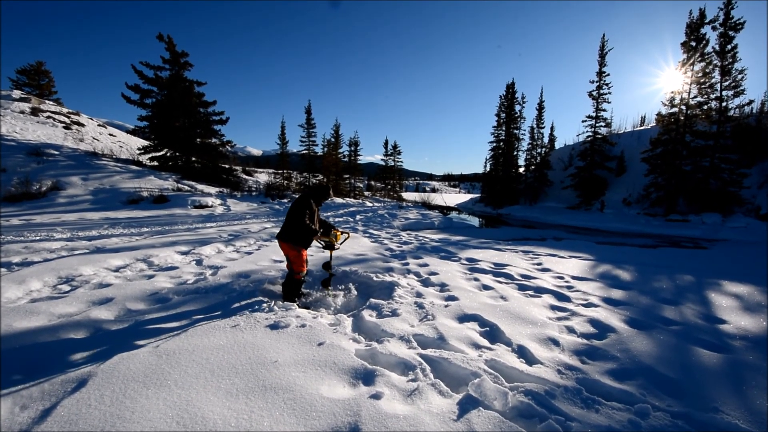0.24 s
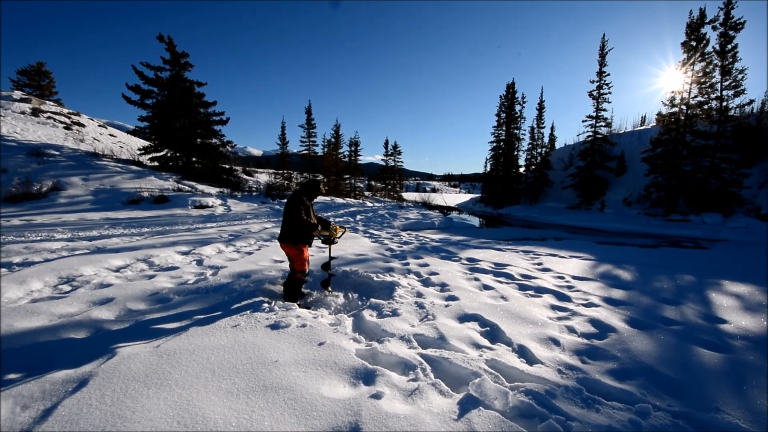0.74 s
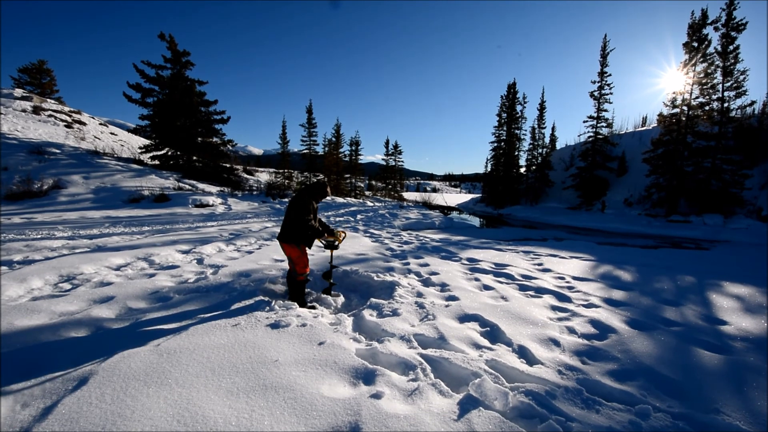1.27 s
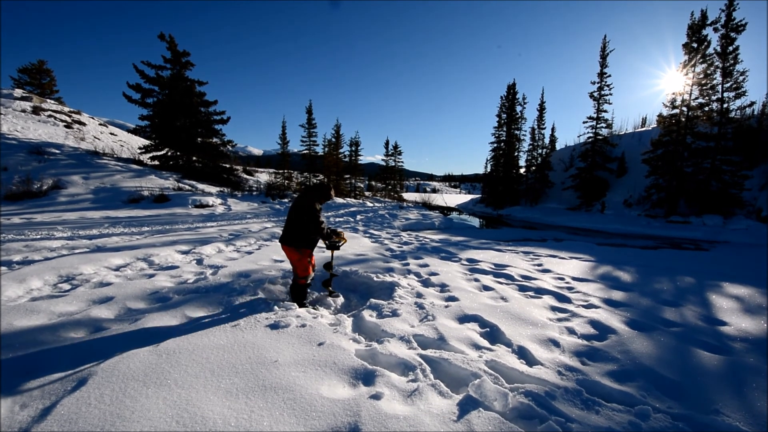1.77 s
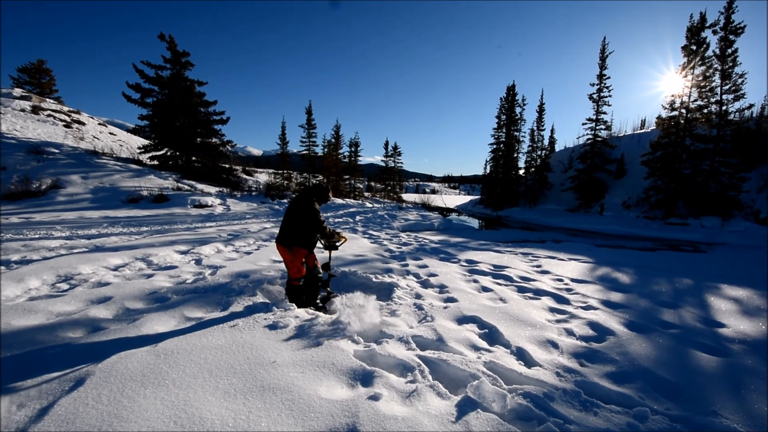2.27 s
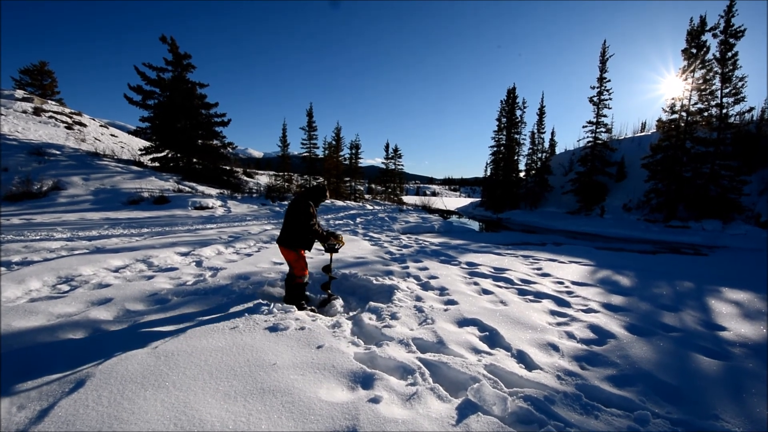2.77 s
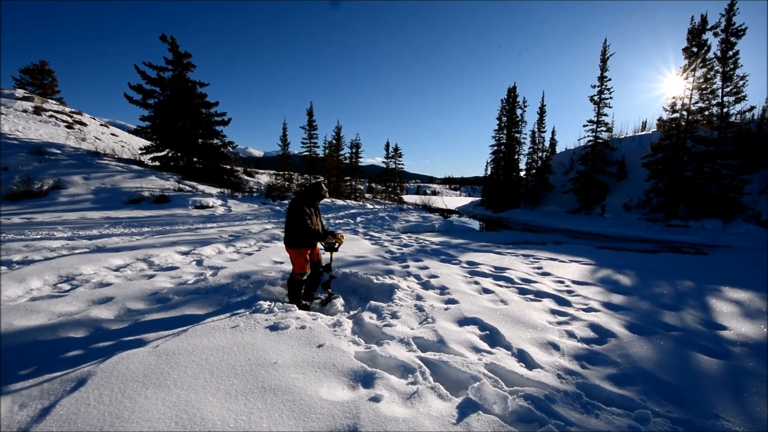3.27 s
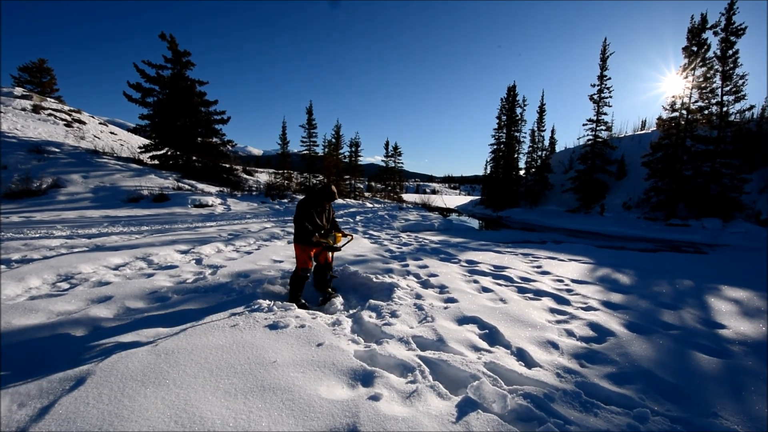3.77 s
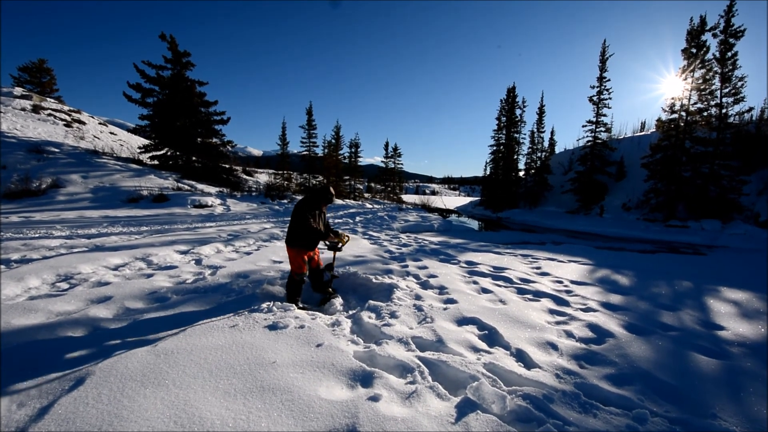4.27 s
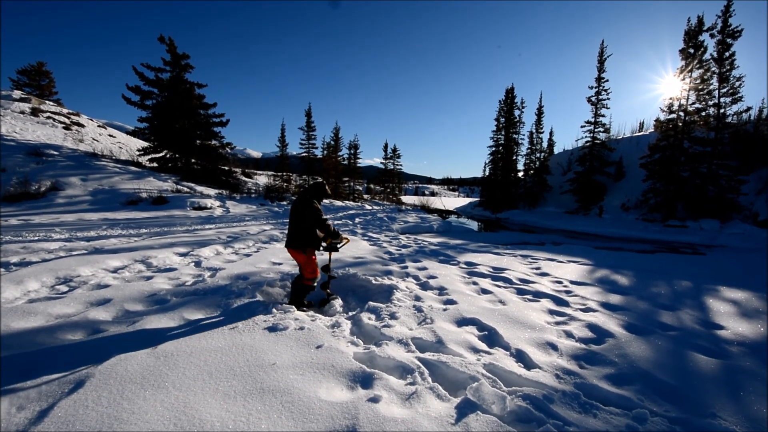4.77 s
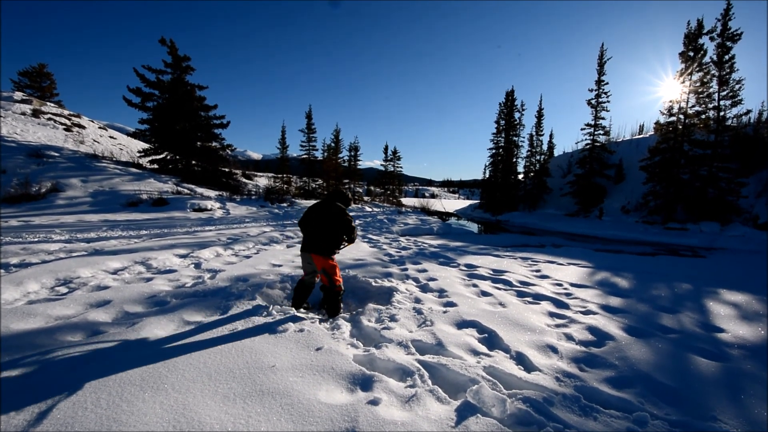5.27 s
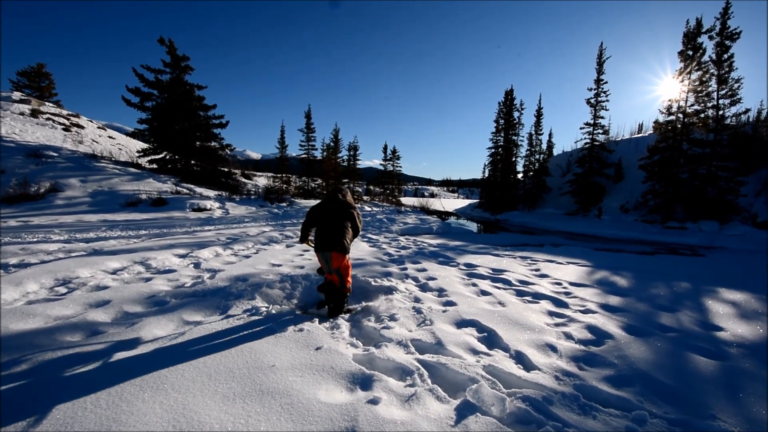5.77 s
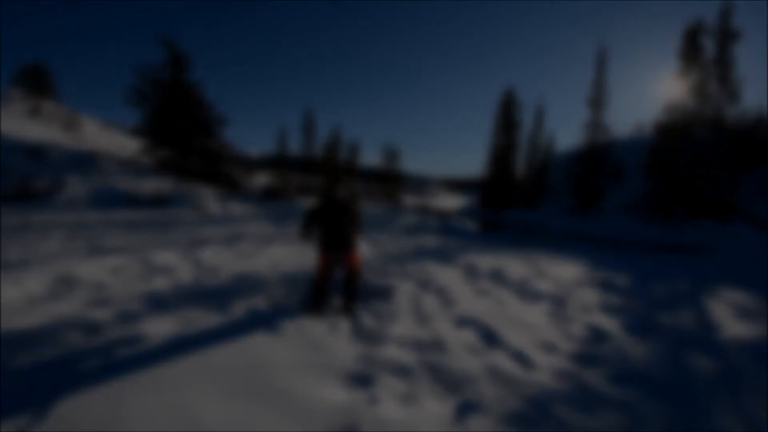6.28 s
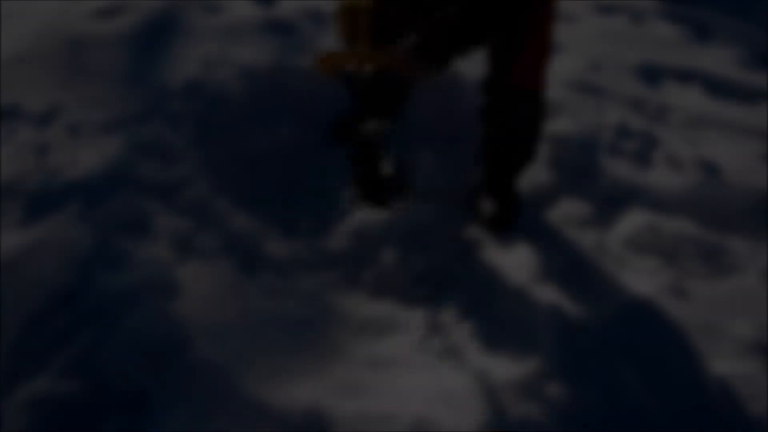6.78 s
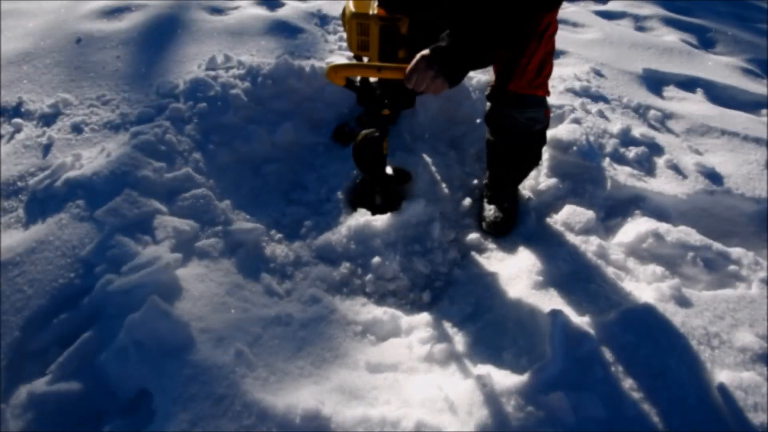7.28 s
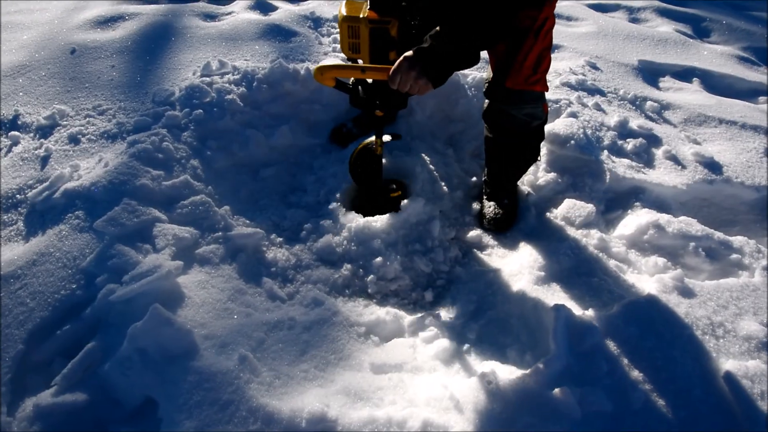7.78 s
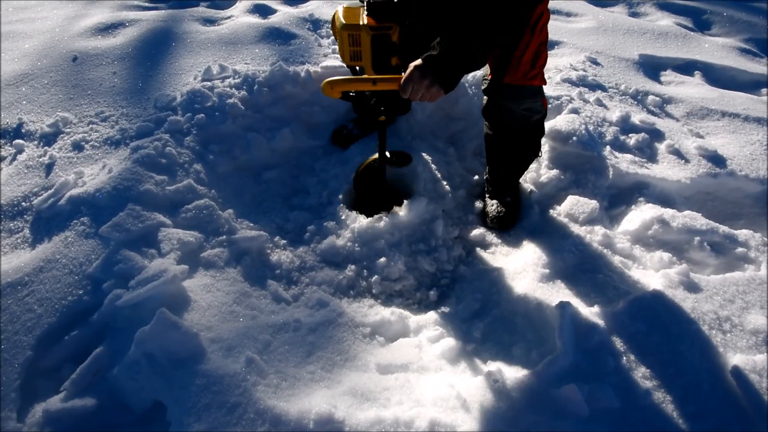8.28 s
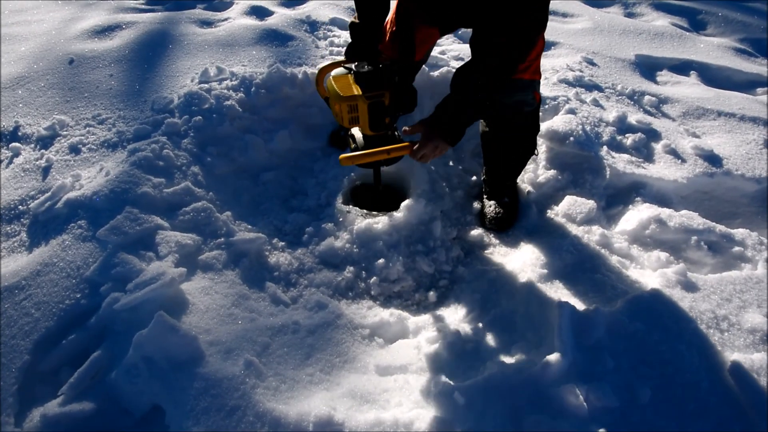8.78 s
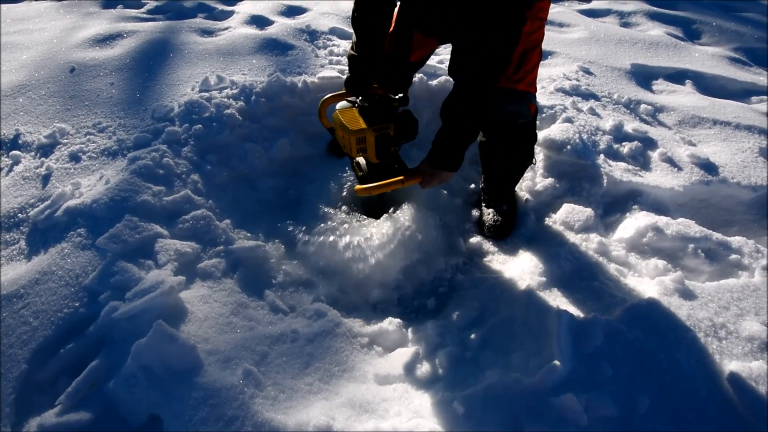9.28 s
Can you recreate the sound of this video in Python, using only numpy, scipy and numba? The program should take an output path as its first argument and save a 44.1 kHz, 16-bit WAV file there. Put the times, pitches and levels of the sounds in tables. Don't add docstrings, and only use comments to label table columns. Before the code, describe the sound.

Gas-powered ice drill on an open snowy lake coasts down to a ragged idle, cuts abruptly to labouring, whining drilling, then winds down again.

```python
import sys
import numpy as np
from scipy import signal
from scipy.fft import rfft, irfft, next_fast_len
from scipy.io import wavfile
from scipy.ndimage import uniform_filter1d
from numba import njit

SR = 44100
rng = np.random.default_rng(int(sys.argv[2]) if len(sys.argv) > 2 else 0)


def volts_from_decibels(level):
    exponent = np.asarray(level, float) / 20
    return 10 ** exponent


def generate_wav(sig):
    pcm = np.round(np.clip(np.atleast_2d(sig).T, -1, 1) * 32767).astype(np.int16)
    wavfile.write(sys.argv[1], SR, pcm)


N = 420273
CHANGE_S = 5.895


def unit(x):
    return x / np.sqrt(np.mean(x ** 2))


def on_log(hz, table):
    f, db = np.transpose(table)
    return np.interp(np.log(np.maximum(hz, 1)), np.log(f), db, db[0] - 36, db[-1] - 32)


def colour(x, table):
    size = next_fast_len(N)
    hz = np.arange(size // 2 + 1) * SR / size
    return irfft(rfft(x, size) * volts_from_decibels(on_log(hz, table)), size)[:N]


@njit
def svf(x, hz, width):
    y, b, l = np.empty(len(x)), 0., 0.
    for i in range(len(x)):
        g, k = np.tan(np.pi * hz[i] / SR), width[i] / hz[i]
        v = (b + g * (x[i] - l)) / (1 + g * (g + k))
        b, l, y[i] = 2 * v - b, l + 2 * g * v, k * v
    return y


def ring(x, modes):
    return sum(volts_from_decibels(db) * 300 / w * signal.lfilter(*signal.iirpeak(f, f / w, SR), x) for f, w, db in modes)


def walk(rate):
    k = int(SR / rate)
    held = np.repeat(rng.standard_normal(N // k + 1), k)
    return 1.52 * uniform_filter1d(uniform_filter1d(held, k), k)[:N]


def spell(t, start_s, end_s):
    return np.clip(np.minimum(t - start_s, end_s - t) / 0.065, 0, 1)


def spells(t, rows):
    return sum(np.outer(row[2:], spell(t, *row[:2])) for row in rows)


# start_s, peak_db
CRACKS = [(0.942, -26), (1.027, -31), (1.1712, -23), (1.299, -20.5), (1.3591, -23), (1.4661, -35),
          (1.6563, -30), (1.8976, -28), (2.0107, -26), (2.0904, -27.5), (2.2907, -35), (2.4456, -33),
          (2.603, -34), (2.7268, -29), (2.7966, -26.5), (2.8656, -29), (2.937, -32), (2.9906, -30),
          (3.0634, -31), (3.1351, -26.5), (3.2082, -28), (3.353, -34.5), (3.3907, -31), (3.4442, -33),
          (3.5533, -30), (3.735, -26.5), (3.8079, -29.5), (3.934, -26.5), (4.0252, -28), (4.1346, -26),
          (4.2246, -28.5), (4.2975, -26)]
# start_s, peak_db
LATE_CRACKS = [(4.3875, -28), (4.567, -38), (4.628, -29.5), (4.7041, -33), (4.951, -35), (5.045, -33),
               (5.1174, -29.5), (5.2116, -31.5), (5.3069, -35.5), (5.4032, -41), (5.48, -42), (5.557, -42),
               (5.617, -40), (5.693, -40), (5.772, -43), (5.896, -38), (6.2151, -22), (6.2849, -17),
               (6.3984, -18.5), (6.465, -17), (6.498, -17), (6.539, -18), (6.637, -17), (6.711, -20.5),
               (8.04, -19.5), (8.4085, -23), (9.008, -26), (9.3103, -22), (9.382, -21.5), (9.4411, -22),
               (9.502, -19)]


def hard_firings():
    return np.vstack([CRACKS, LATE_CRACKS])


# start_s, crank_hz, level_db, throttle (0-1)
FAR = [(0.0, 102.6, -25, 0.86), (0.11, 114, -26, 0.75), (0.19, 121.8, -25.5, 0.54),
       (0.27, 126, -25.5, 0.46), (0.421, 118, -26, 0.23), (0.79, 91.54, -27.5, 0.22),
       (1.26, 70.2, -28.5, 0.45), (1.4, 65.3, -29.5, 0.3), (2.031, 62.34, -34.5, 0.37),
       (2.62, 56.3, -37, 0.5), (2.76, 57.46, -36.5, 0.56), (3.23, 55.42, -37, 0.53),
       (4.1, 54.9, -35.5, 0.51), (4.2, 55.6, -36, 0.54), (4.548, 54.5, -36, 0.41), (4.7, 52.47, -39, 0.53),
       (5.232, 52.64, -43, .1), (5.381, 50.8, -48, 0.27), (5.88, 50.56, -47.5, 0.24)]
# start_s, crank_hz, level_db, throttle (0-1)
NEAR = [(5.903, 91.22, -40, 0.78), (5.98, 82.34, -41, 0.92), (6.18, 68.63, -31, 0.89),
        (6.24, 72.97, -30, 0.94), (6.491, 73.82, -29, 0.87), (6.6, 71.6, -30.5, 0.9),
        (6.76, 97, -25.5, 0.8), (6.89, 97.57, -26.5, 0.83), (7.13, 90.74, -28, 0.88),
        (7.49, 86.32, -28, 0.92), (7.82, 75.26, -28, 0.98), (8.06, 77.47, -29, 0.96),
        (8.229, 85.9, -27, 0.9), (8.37, 87.35, -28.5, 0.9), (8.52, 107.8, -25, 0.83),
        (8.6, 116.2, -25.5, 0.71), (8.73, 124.2, -27, 0.74), (8.8, 122, -26, 0.27),
        (8.98, 101.5, -27.5, 0.22), (9.21, 81.23, -25.5, 0), (9.36, 70.44, -27.5, 0.18),
        (9.53, 61.8, -29.5, 0.53)]


def engine_course(t, hard_s):
    kick_hz, sag_s = 1.2, .05
    far, close = np.transpose(FAR), np.transpose(NEAR)
    hz, can_db, throttle = (np.where(t > CHANGE_S, np.interp(t, close[0], b), np.interp(t, far[0], a))
                            for a, b in zip(far[1:], close[1:]))
    kicks = np.zeros(N)
    kicks[(hard_s * SR).astype(int)] = kick_hz
    kicks = signal.lfilter([1], [1, -np.exp(-1 / (sag_s * SR))], kicks)
    kicks = uniform_filter1d(kicks, size=300) - uniform_filter1d(kicks, size=12000)
    return hz + kicks, can_db, throttle, kicks / kick_hz


def crank(hz, fire_s):
    turns = np.cumsum(hz) / SR
    at, shift = [fire_s[0] * SR], [-turns[int(fire_s[0] * SR)] % 1]
    for s in fire_s[1:]:
        miss = (turns[int(s * SR)] + shift[-1] + .5) % 1 - .5
        if abs(miss) < .17 or s - at[-1] / SR > .25:
            at.append(s * SR)
            shift.append(shift[-1] - miss)
    return turns + np.interp(np.arange(N), at, shift)


def rasp(turn, since, memory):
    fresh = rng.standard_normal((turn.max() + 1, 1200))
    rows = signal.lfilter([np.sqrt(1 - memory ** 2)], [1, -memory], fresh, axis=0)
    return rows[turn, np.minimum(since * SR, 1199).astype(int)]


# pitch_hz, level_db
ROAR_FAR = [(88, -60), (150, -28), (216, -20), (356, -23.5), (776, -6.5), (1010, -6), (1620, 0.5),
            (2040, -3), (2470, -2.5), (2820, -7), (5000, -15.5), (6500, -43), (11000, -120)]
# pitch_hz, level_db
ROAR_NEAR = [(88, -19), (150, -16.5), (290, -15.5), (362, -9), (554, -6.5), (660, -10), (732, -3.5),
             (1520, -1.5), (2400, 0), (4130, -17.5), (5000, -15.5), (6500, -20), (11000, -120)]


def loaded_roar(gas, near, throttle):
    thin_db, thin_below_hz = -4.5, 740
    roar = (1 - near) * unit(colour(gas, ROAR_FAR)) + near * unit(colour(gas, ROAR_NEAR))
    low = signal.sosfiltfilt(signal.butter(2, thin_below_hz, fs=SR, output="sos"), roar)
    return roar - near * (1 - volts_from_decibels(thin_db * np.clip((.9 - throttle) / 0.21, 0, 1))) * low


# start_s, chamber_db, can_db, shell_db, hum_db
FACING = [(1.35, -2, -5, -25, 0), (1.6, -3.5, 1.5, -15, 4), (2.0, -0.5, 3, -16, 2.5),
          (2.6, -0.5, 5, -20, 0), (3.42, 0, 5, -26, 1), (3.5, -4.5, 9.5, -22, 2.5), (3.9, -7.5, 1, -35, 3),
          (4.2, -1.5, 1, -20, 1), (4.65, -0.5, -3, -13, 1.5), (5.2, 3.5, -1, -15, 4),
          (5.34, -8, -4, -20, 1), (5.56, -1, 2, -20, 1), (5.62, -12, 8, -20, 2)]


def facing(t):
    s, *faces = np.transpose(FACING)
    return [np.interp(t, s, db) for db in faces]


# pitch_hz, width_hz, level_db
MUFFLER = [(330, 60, -21), (1690, 36, 1.5), (2140, 97.7, -8), (2280, 120, -6), (2870, 750, -41),
           (3875, 59.4, -6.5)]
# pitch_hz, width_hz, level_db
SHELL = [(2380, 110, 0)]
# pitch_hz, level_db
ROAR_IDLE = [(150, -34), (300, -29), (500, -22), (700, -16), (1000, -13), (1380, -15), (1800, -7),
             (2400, -4), (3500, -11), (5000, -21), (6500, -50)]
SKIPPED_S = [
    3.335,
]


def muffler(t, turns, hz, idle, near, throttle):
    putt_hz, putt_s = 1380, .0075
    turn, angle = np.maximum(turns.astype(int), 0), turns % 1
    chance = rng.standard_normal((turn.max() + 2, 3))[turn].T
    new_turn = np.r_[0, np.diff(turn)]
    start = np.maximum.accumulate((new_turn > 0) * np.arange(N))
    since = (np.arange(N) - start) / SR + angle[start] / hz[start]
    skipped = np.abs(start[:, None] / SR - SKIPPED_S).min(axis=1) < .007
    size = volts_from_decibels(1.1 * chance[0]) * np.where(skipped, .2, 1)

    held = (1 - np.exp(-since / .0012)) * np.exp(-(since / putt_s) ** 2.2) * volts_from_decibels(1.2 * walk(300))
    phase = 2 * np.pi * putt_hz * (1 + .003 * chance[1]) * since + .3 * chance[2]
    putt = unit(size * held * np.sin(phase))

    flow = rasp(turn, since, memory=.5)
    puff = new_turn * size + 0.056 * size * np.exp(-angle / 0.9) * flow
    can = unit(ring(puff, MUFFLER))
    gas = (1 + (0.96 + 1.46 * idle) * size * np.exp(-angle / 0.56)) * volts_from_decibels(0.65 * walk(40)) * flow

    note_db, ring_db, shell_db, _ = facing(t)
    idling = volts_from_decibels(note_db - 1.5) * putt + volts_from_decibels(ring_db - 14.0) * can + volts_from_decibels(-10.0) * unit(colour(gas, ROAR_IDLE))
    idling = idling + volts_from_decibels(shell_db) * unit(ring(puff, SHELL))
    loaded = loaded_roar(gas, near, throttle) + volts_from_decibels(-23.0) * can + volts_from_decibels(-15.5) * putt
    return idle * idling + (1 - idle) * loaded


# start_s, end_s, tones_db, rattle_db
TURNS = [
    (0.132, .44, 1.5, 1.5),
    (.45, 1.295, 1.5, 0.5),
    (1.451, 2.4, -0.5, 0),
    (2.424, 3.048, -0.5, 0.5),
    (4.399, 4.75, 1.5, -1.5),
    (3.536, 4.14, 0, 4),
    (5.295, 5.892, 12, 1.5),
    (8.724, 8.972, -10, 2),
    (9.332, 9.468, 16, -0.5),
]


def operator_turns(t):
    return spells(t, TURNS)


# pitch_hz, level_db
EXHAUST = [(100, -18), (165, -39), (230, -8.5), (300, 3), (400, -1.5), (480, 0), (620, -18.5), (900, -20),
           (1300, -8.5)]
BEAT_DB = [8, 5, -7, 1, 0, -2, 7, 15.5, 9, 4.5, -8, 9.5]
IDLE_DB = [-13.5, -30, -6.5, -8, 3, -22, -24, -9, -7.5, -9.5, -12, -9]


def exhaust(hz, idle, slip):
    turns = np.cumsum(uniform_filter1d(hz, size=2000)) / SR
    angle = 2 * np.pi * (turns + 0.006 * walk(25) + 0.074 * slip * walk(60))
    waver = (1.2 + 1.3 * slip) * walk(14)
    tones = np.zeros(N)
    for k, db, idle_db in zip(range(2, 14), BEAT_DB, IDLE_DB):
        level_db = (1 - idle) * (on_log(k * hz, EXHAUST) + db) + idle * idle_db + np.roll(waver, 9001 * k)
        tones += volts_from_decibels(level_db) * np.sin(k * angle + 2 * np.pi * rng.random())
    return tones / np.sqrt(uniform_filter1d(tones ** 2, size=6000))


def crank_thump(turns, hz, idle, near, tone_db, turned_db):
    level_db = -30.0 + 0.12 * (3.0 - idle) * (tone_db + 17.0) + 1.5 * (0.5 - near) * turned_db - 2.0 * idle
    return volts_from_decibels(level_db) * (hz / 90) * np.sin(2 * np.pi * turns)


def weak_firings(turns, idle, can_db, hard_s):
    share, over_db, rest_s = 0.025, -3, 0.026
    at = np.flatnonzero(np.diff(np.floor(turns)))
    chance = rng.random((len(at), 2))
    rested = np.abs(at[:, None] / SR - hard_s).min(axis=1) > rest_s
    pick = rested & (chance[:, 0] < share * idle[at])
    return np.c_[at / SR, can_db[at] + over_db + 6 * (chance[:, 1] - .5)][pick]


# start_s, peak_db
KNOCKS = [
    (6.3004, -18.5),
    (6.3135, -26),
    (6.4147, -20),
    (6.428, -22),
    (6.484, -20),
    (6.5114, -22),
    (6.5552, -23),
    (6.57, -22),
    (6.597, -21),
    (6.61, -22),
]


def all_hits(turns, idle, can_db, hard):
    hits = np.vstack([hard, KNOCKS, weak_firings(turns, idle, can_db, hard[:, 0])])
    over_db = hits[:, 1] - can_db[(hits[:, 0] * SR).astype(int)]
    bark_db = 1.5 - .5 * (over_db - 10) - 3 * (hits[:, 0] > CHANGE_S)
    return np.c_[hits, bark_db]


def thuds(hits):
    blows = np.zeros(N)
    blows[(hits[:, 0] * SR).astype(int)] = volts_from_decibels(hits[:, 1] + hits[:, 2] - 8)
    return SR / 2000 * ring(uniform_filter1d(blows, size=30), [(400, 190, 0)])


def snaps(turns, peak_db, share, listed, modes, low_hz):
    at = np.flatnonzero(np.diff(np.floor(turns)))
    peak = share[at] * volts_from_decibels(peak_db[at] + 2 * rng.standard_normal(len(at)))
    gaps = np.abs(at[:, None] / SR - listed[:, 0])
    peak[gaps.argmin(axis=0)] = volts_from_decibels(listed[:, 1])
    blows = np.zeros(N)
    blows[at] = peak
    band = signal.butter(3, [low_hz, 3900], "bandpass", fs=SR, output="sos")
    return SR / 2000 * signal.sosfilt(band, ring(blows, modes))


# start_s, peak_db
SNAPS = [(1.5774, -22), (1.6106, -22), (1.642, -25), (1.6894, -26), (1.7208, -25), (1.8483, -21),
         (1.9624, -27), (2.0108, -30), (2.089, -39), (2.4444, -27), (2.6014, -32), (2.655, -34),
         (2.725, -19), (2.7951, -23), (2.865, -30), (2.9167, -30), (2.935, -25), (2.971, -31),
         (2.9899, -25), (3.0433, -30), (3.0619, -23), (3.1346, -37), (3.207, -37), (3.261, -29),
         (3.2804, -20), (3.2984, -26), (3.3153, -20), (3.3526, -26), (3.3896, -26), (3.4256, -22),
         (3.443, -29), (3.4801, -18), (3.4986, -21), (3.5339, -33), (3.5533, -36), (3.607, -34),
         (3.6256, -20), (3.6625, -33), (3.7348, -34), (3.8079, -24), (3.9335, -31), (4.0256, -29),
         (4.078, -29), (4.1337, -21), (4.2233, -28), (4.278, -30), (4.2959, -21), (4.3498, -29),
         (4.368, -30), (4.3879, -28), (4.4763, -23), (4.5702, -24), (4.608, -27), (4.6282, -27),
         (4.704, -26), (4.742, -31), (4.8387, -23), (4.874, -31), (4.9494, -28), (5.1176, -37)]
# pitch_hz, width_hz, level_db
PORT = [(2200, 380, -7), (2750, 450, -6), (3350, 550, -10)]


def port_snaps(turns, can_db, share):
    return snaps(turns, can_db + 7, share, np.array(SNAPS) + [0, 2], PORT, 1800)


# start_s, peak_db
POPS = [(0.4819, -25), (0.5533, -17), (0.5734, -22), (0.628, -22), (0.688, -22), (0.7193, -24),
        (0.7319, -22), (0.74, -22), (0.7582, -24), (0.7724, -23), (0.7892, -22), (0.8048, -21),
        (0.8156, -15), (0.8504, -17), (0.8603, -22), (0.8717, -22), (0.8836, -19), (0.9077, -25),
        (0.9195, -21), (0.9562, -23), (0.9791, -20), (0.9925, -27), (1.0052, -20), (1.0161, -20),
        (1.0274, -20), (1.079, -22), (1.1032, -26), (1.1161, -23), (1.1443, -17), (1.1728, -19),
        (1.1995, -24), (1.2126, -19), (1.2574, -15), (1.2762, -17), (1.3002, -23), (1.3152, -25)]
# pitch_hz, width_hz, level_db
POP = [(1380, 180, -8), (1910, 380, -14.5), (2300, 400, -5), (3250, 510, -11)]


def clear_pops():
    return np.array(POPS) + [-.0012, 5]


def coasting_pops(turns, can_db, throttle, share):
    shut_db, open_db = 4.5, 2
    return snaps(turns, can_db + shut_db + (open_db - shut_db) * throttle, share, clear_pops(), POP, 960)


def rattle_level(idle, slip, near, throttle, turned_db):
    view_db = np.where(near, -8.5 + 6.5 * throttle, -12)
    return view_db + 2.5 * slip - 2 * idle + turned_db


# pitch_hz, level_db
RATTLE = [(2060, -2), (3500, -0.5), (4160, -1.5), (7510, -0.5), (8150, -1.5), (13200, -3.5), (15100, -3.5),
          (16000, -15)]
# pitch_hz, width_hz, level_db
CASING = [(4980, 180, -5), (6010, 170, -2), (6450, 150, -4), (7170, 140, -2), (7750, 100, -3),
          (8460, 170, -1), (9450, 170, -2), (10380, 120, -4), (13300, 280, -2)]


def rattle(turns, idle):
    early = turns + .27
    turn, angle = np.maximum(early.astype(int), 0), early % 1
    size = volts_from_decibels(2.6 * rng.standard_normal(turn.max() + 2))[turn]
    beat = 1 + (1.26 + 1.5 * idle) * size * np.exp(-angle / 0.42)
    hiss = beat * volts_from_decibels(0.46 * walk(30)) * rng.standard_normal(N)
    hiss = unit(colour(hiss, RATTLE)) + volts_from_decibels(-15.5) * unit(ring(hiss, CASING))
    return hiss / np.sqrt(uniform_filter1d(hiss ** 2, size=9000))


def cracks(hits):
    t = np.arange(2600) / SR
    tails_s = (.003, .0065)
    shapes = [(1 - np.exp(-t / 0.0005)) * (np.exp(-t / tail) + 0.2 * np.exp(-t / 0.013)) for tail in tails_s]
    bright, bark = np.zeros(N + len(t)), np.zeros(N + len(t))
    for s, peak_db, can_db in hits:
        i, shape = int(s * SR), shapes[int(s > CHANGE_S + .1)]
        bright[i:i + len(t)] += volts_from_decibels(peak_db) * shape
        bark[i:i + len(t)] += volts_from_decibels(peak_db + can_db) * shape
    noise = rng.standard_normal((2, N))
    metal = unit(colour(noise[0], RATTLE)) + volts_from_decibels(-1.5) * unit(ring(noise[0], CASING))
    gas = unit(colour(noise[1], ROAR_IDLE))
    return volts_from_decibels(-5.5) * bright[:N] * unit(metal) + volts_from_decibels(-7.0) * bark[:N] * gas


# start_s, end_s, level_db
SQUEALS = [
    (6.15, 6.3, -5),
    (6.26, 6.36, 5),
    (6.44, 6.56, 2),
    (6.55, 6.7, -4),
    (9.299, 9.6, 8),
]


def clutch(t, turns, slip, near, throttle, kick):
    modes = [(10300, 300, -3), (10600, 200, 2), (7700, 260, -4), (6740, 410, -3)]  # pitch_hz, width_hz, level_db
    bursts = volts_from_decibels(2.5 * walk(30)) * (0.22 + np.exp(-(turns % 1) / 0.27))
    sing_db = spells(t, SQUEALS)[0] - 6.5 - 3 * (2 - near) + 15.2 * throttle + 5 * throttle * near * kick
    return volts_from_decibels(sing_db) * slip * bursts * unit(ring(rng.standard_normal(N), modes))


# pitch_hz, width_hz, level_db
DRUM = [(6600, 130, -7), (6970, 200, 2), (7700, 80, -8), (9380, 190, -1), (10240, 110, -6)]
# start_s, end_s, level_db over the engine
DRUM_SPELLS = [
    (1.148, 1.5, -16.5),
    (1.45, 1.75, -13.5),
    (1.7, 2.0, -16.5),
    (2.0, 2.45, -28),
]


def drum(t, turns):
    nudge = (.4 + np.exp(-(turns % 1) / .3)) * volts_from_decibels(2.4 * walk(30.7))
    level = sum(volts_from_decibels(db) * spell(t, a, b) for a, b, db in DRUM_SPELLS)
    return level * unit(ring(nudge * rng.standard_normal(N), DRUM))


def steady(x):
    return unit(x / uniform_filter1d(x ** 2, size=700) ** (.65 / 2))


# relative width (ratio), level_db
FAN = [(0.028, -2), (0.052, 0.5), (0.03, 4.5), (0.013, 6), (0.007, 5.5)]
# pitch_hz, level_db
COWL = [(450, -3.5), (700, 2), (1000, -6), (1250, 5.5), (1550, 1.5), (1830, -14), (2100, -3.5), (2400, -8),
        (2650, -15), (3050, -10), (4000, -16), (5200, -25)]
# start_s, end_s, line_db, overtones_db
WHINE = [(1.4, 2.1, -10, 1), (6.2, 6.62, -20, 3.5), (8.81, 8.98, 2, -4), (9.12, 9.3, 4, -7),
         (5.87, 6.179, 2.5, 2.5), (0.201, 0.467, -19, -12), (0.756, 1.059, -4.5, -1),
         (6.586, 6.984, -8, -2), (7.05, 7.249, 4, -0.5), (7.25, 7.601, 1, -1.5), (7.621, 7.902, 0.5, 1.5),
         (7.9, 8.15, -2.5, 1.5), (8.348, 8.558, -14, 1), (8.556, 8.804, 10.5, 9), (8.984, 9.12, -4, 5)]
# start_s, end_s, third_db, higher_db
WHINE_TOP = [(.05, .5, -8, -10), (.6, 1.0, -1, -7), (5.88, 6.027, -3, 2), (6.031, 6.221, 10, 0),
             (6.22, 6.62, -6, -5), (6.65, 6.951, 0, -10), (6.95, 7.551, 2.5, -0.5), (7.645, 8.052, -4, 1.5),
             (8.098, 8.403, 6.5, 1), (8.42, 8.9, 2, -11), (8.9, 9.2, -6, 0), (9.2, 9.45, -1, -2)]


def fan(t, turns, hz, idle, slip, near, throttle):
    blade_hz = 8 * hz
    line = np.sin(2 * np.pi * 8 * (turns + .015 * walk(50)))
    blades = volts_from_decibels(on_log(blade_hz, COWL) + 1.8 * walk(30)) * line
    bands = []
    for k, (width, db) in enumerate(FAN, 1):
        f = k * blade_hz
        noise = steady(svf(rng.standard_normal(N), f, width * f))
        bands.append(volts_from_decibels(db + on_log(f, COWL) + 0.27 * walk(7.4)) * noise)
    line_db, over_db = spells(t, WHINE)
    third_db, top_db = spells(t, WHINE_TOP)
    whine = volts_from_decibels(line_db) * (volts_from_decibels(-4.5) * blades + bands[0])
    whine = whine + sum(volts_from_decibels(db) * tone for db, tone in zip([over_db, third_db, top_db, top_db], bands[1:]))
    fan_db = np.where(near, -14.5, -17.5) + 4.5 * throttle - 4 * slip * near - 5 * idle + 2 * walk(25)
    return volts_from_decibels(fan_db) * whine


# start_s, pitch_hz, length_s, peak_db
BUMPS = [
    (3.268, 775, 0.044, -44),
    (3.27, 165, .05, -54),
    (9.357, 452, .095, -36),
]


def bumps(t):
    return sum(volts_from_decibels(db) * np.sin(np.pi * np.clip((t - s) / length, 0, 1)) * np.sin(2 * np.pi * hz * t)
               for s, hz, length, db in BUMPS)


# pitch_hz, level_db
SNOW = [(2000, 3.5), (4000, 0), (4800, -2.5), (5800, -0.5), (6600, -0.5), (10500, 3), (11500, -1),
        (16000, 0.5)]


def over_snow(bright, near):
    return near * bright + (1 - near) * colour(bright, [(20, 0)] + SNOW)


# pitch_hz, level_db
PORTS = [(100, -40), (250, -14), (600, -19.5), (1500, -19), (3000, -4.5), (8000, -6.5), (16000, 1.5)]


def side_difference(engine):
    return volts_from_decibels(-20.0) * colour(np.roll(engine, 97), PORTS)


# pitch_hz, level_db
AIR = [(25, -36), (60, -29), (100, -8), (160, -19), (300, -5), (550, -8.5), (700, -17), (1620, -4),
       (2500, -24), (5280, -29), (15500, -60)]


def open_air():
    return volts_from_decibels(-51 + 1.5 + 0.46 * walk(16)) * unit(colour(rng.standard_normal(N), AIR))


def breeze(t, near):
    gust_db = -78 + 5 * spell(t, 6.2, 6.6) - 7 * spell(t, 8.5, 9.6) + 3.5 * walk(6.3)
    return near * volts_from_decibels(gust_db) * unit(colour(rng.standard_normal(N), [(18, -10), (35, 0), (70, 5)]))


def scene():
    t = np.arange(N) / SR
    near = 1. * (t > CHANGE_S)
    hard = hard_firings()
    hz, can_db, throttle, kick = engine_course(t, hard[:, 0])
    snap_s = np.transpose(SNAPS)[0]
    apart = np.abs(hard[:, :1] - snap_s).min(axis=1) > .01
    snap_peak_s = snap_s + .0011
    turns = crank(hz, np.sort(np.r_[hard[apart, 0], snap_peak_s, clear_pops()[:, 0]]))

    idle = np.clip((66 - hz) / 5 + .5, 0, 1)
    slip = np.clip((75 - hz) / 2.56, 0, 1) * np.clip((hz - 58) / 4, 0, 1)
    slip = slip * np.clip(np.abs(t - CHANGE_S) / 0.57, 0, 1)
    can_db = can_db + 6.5 * throttle * near * slip * kick
    turned_db, metal_db = operator_turns(t)
    shut_db, open_db = -32, -3
    tone_db = shut_db + (open_db - shut_db) * throttle + turned_db + idle * (1 - near) * facing(t)[3]

    hits = all_hits(turns, idle, can_db, hard)
    casing_db = can_db + rattle_level(idle, slip, near, throttle, metal_db) - 0.5
    bright = volts_from_decibels(casing_db) * (rattle(turns, idle) + clutch(t, turns, slip, near, throttle, kick))
    bright = bright + cracks(hits) + volts_from_decibels(can_db) * drum(t, turns)
    bright = over_snow(bright, near)
    bright = bright + volts_from_decibels(13 * spell(t, 5.28, CHANGE_S)) * thuds(hits)
    bright = bright + port_snaps(turns, can_db, idle * (1 - near))
    bright = bright + coasting_pops(turns, can_db, throttle, 1 - idle)

    body = muffler(t, turns, hz, idle * (1 - 0.84 * near), near, throttle)
    body = body + crank_thump(turns, hz, idle, near, tone_db, turned_db)
    body = body + volts_from_decibels(tone_db - 2.5) * exhaust(hz, idle, slip * near)
    body = body + fan(t, turns, hz, idle, slip, near, throttle)
    engine = bright + volts_from_decibels(can_db) * body
    return engine + bumps(t) + open_air() + breeze(t, near) + side_difference(engine) * np.array([[1], [-1]])


def band_limit(x):
    return signal.sosfilt(signal.butter(12, 16650, fs=SR, output="sos"), x)


def record(dry):
    rounded = np.tanh(3 * dry) / 3
    top_hz = 15850
    mix = signal.sosfilt(signal.ellip(8, .2, 60, top_hz, fs=SR, output="sos"), rounded)
    return band_limit(mix)


dry = scene()
out = record(dry)
generate_wav(out)
```